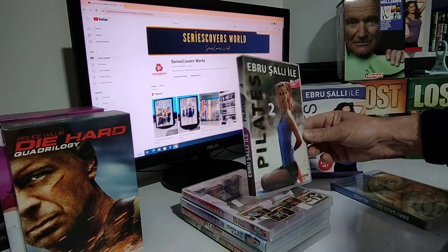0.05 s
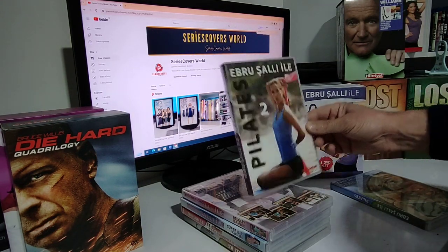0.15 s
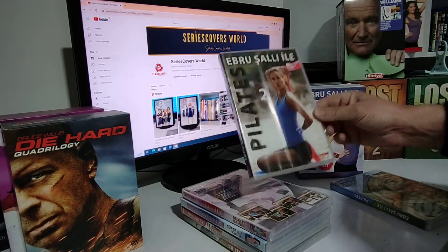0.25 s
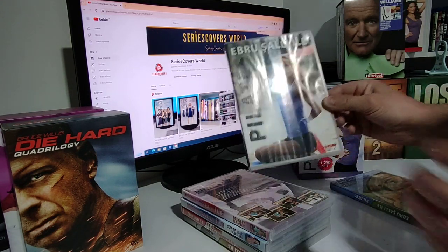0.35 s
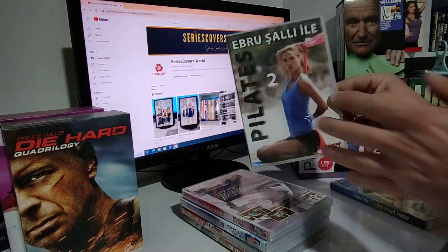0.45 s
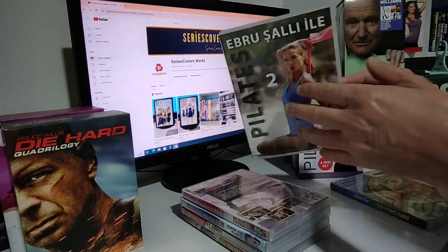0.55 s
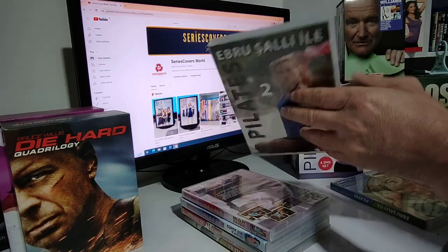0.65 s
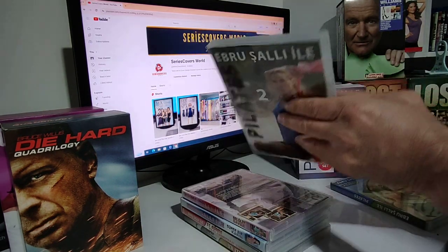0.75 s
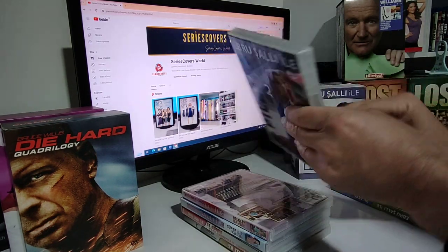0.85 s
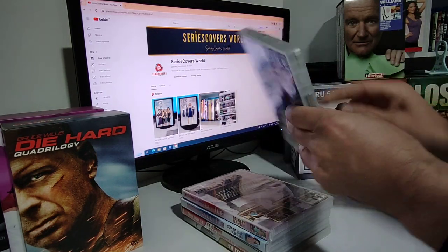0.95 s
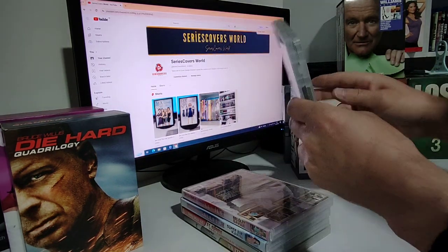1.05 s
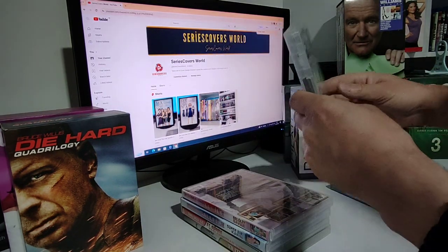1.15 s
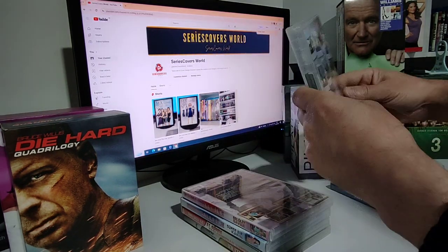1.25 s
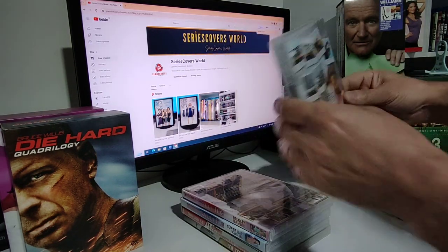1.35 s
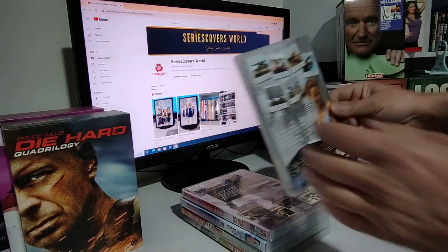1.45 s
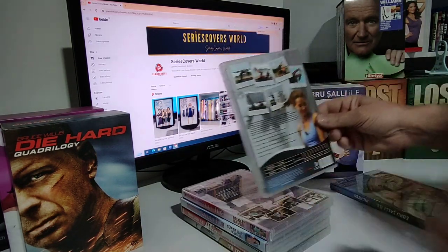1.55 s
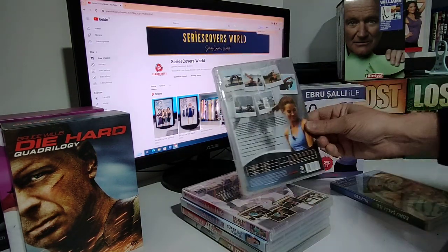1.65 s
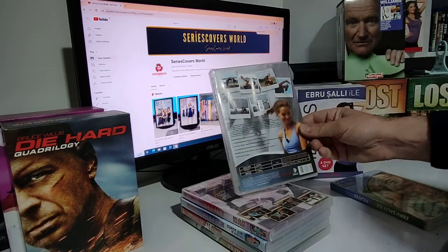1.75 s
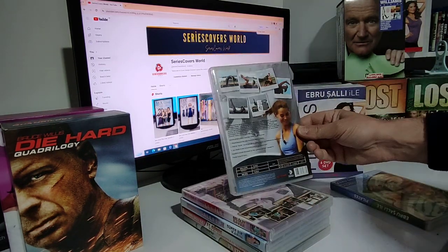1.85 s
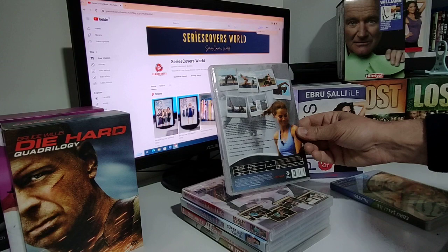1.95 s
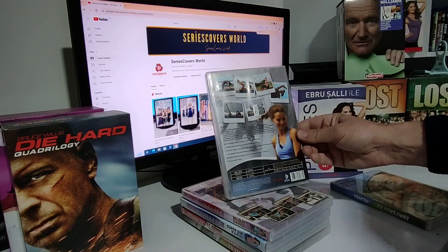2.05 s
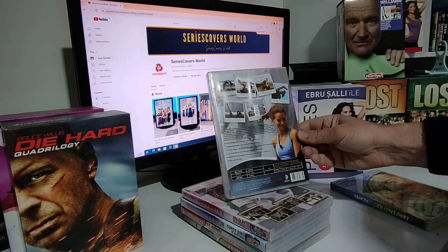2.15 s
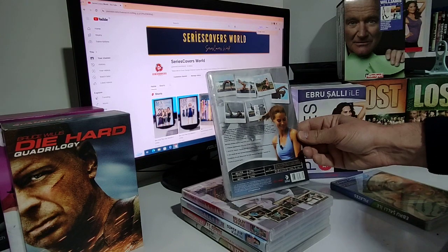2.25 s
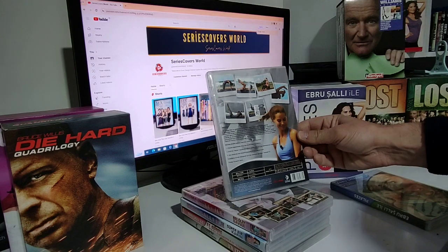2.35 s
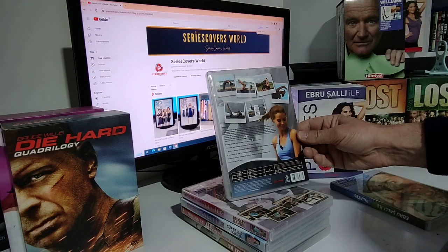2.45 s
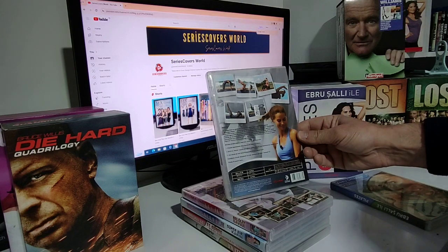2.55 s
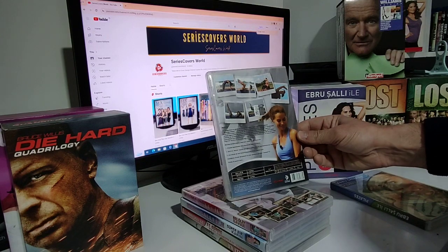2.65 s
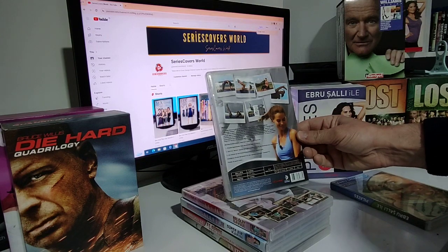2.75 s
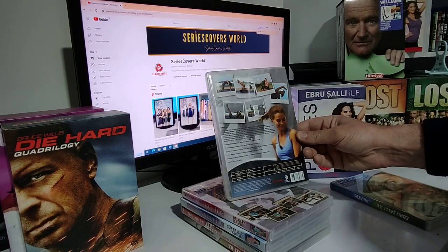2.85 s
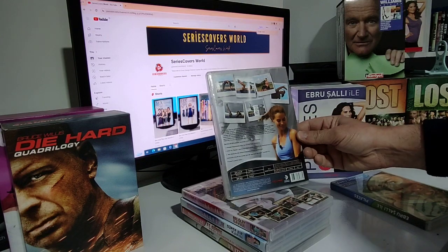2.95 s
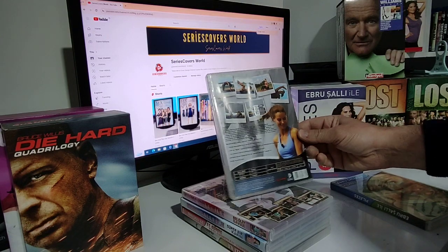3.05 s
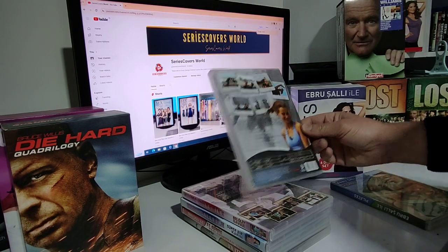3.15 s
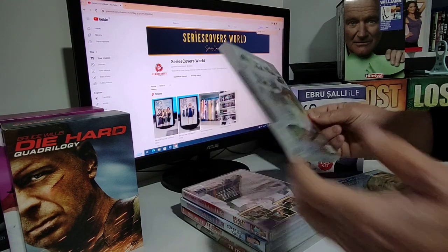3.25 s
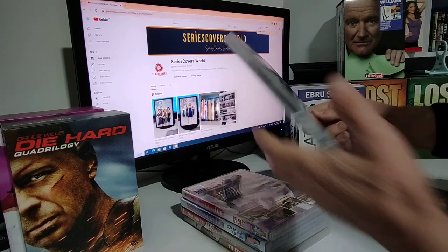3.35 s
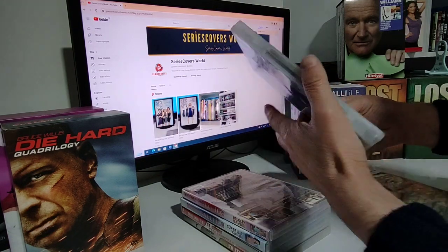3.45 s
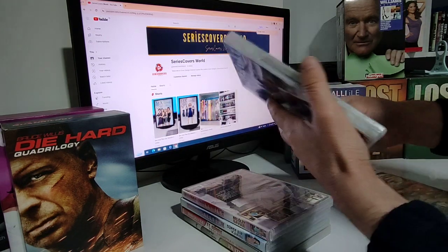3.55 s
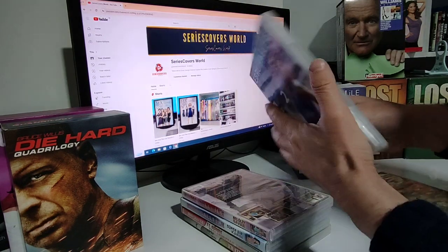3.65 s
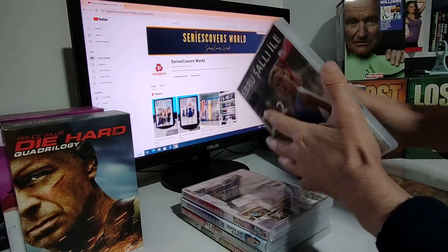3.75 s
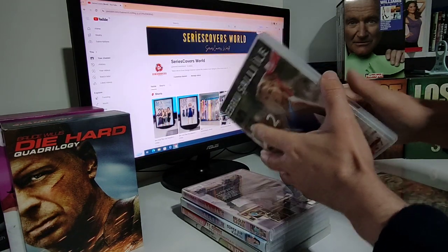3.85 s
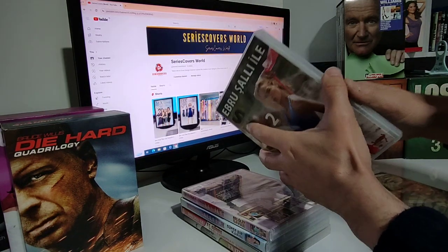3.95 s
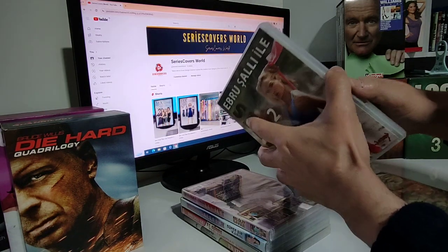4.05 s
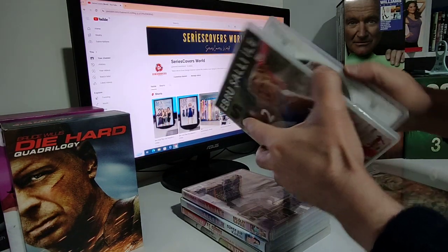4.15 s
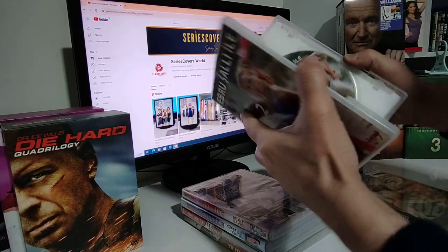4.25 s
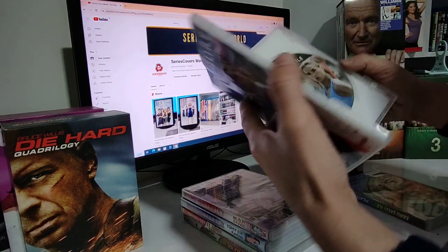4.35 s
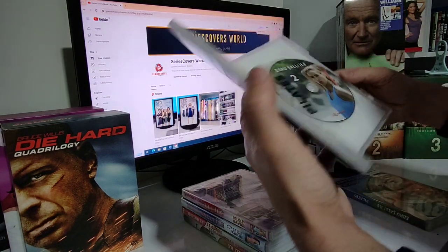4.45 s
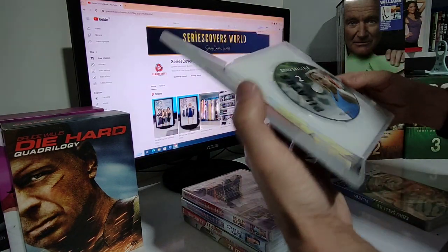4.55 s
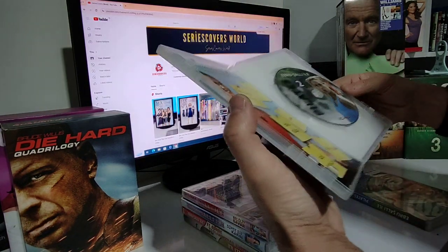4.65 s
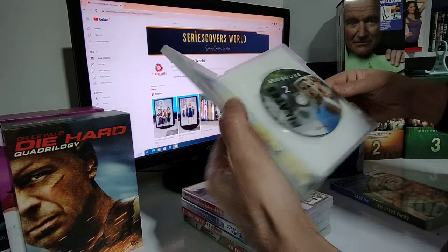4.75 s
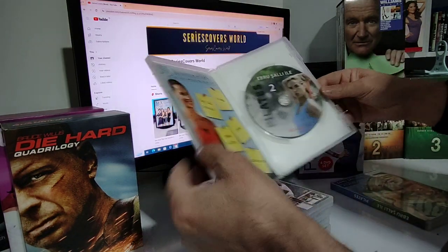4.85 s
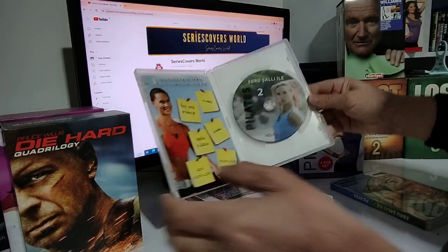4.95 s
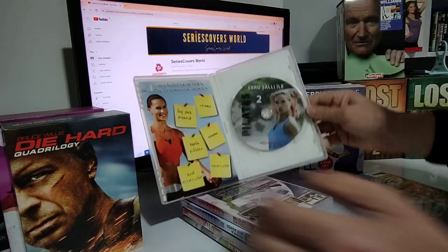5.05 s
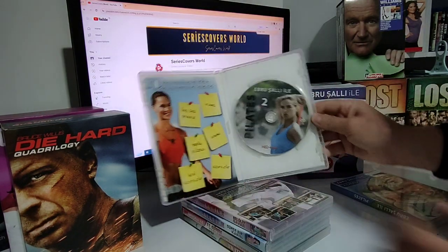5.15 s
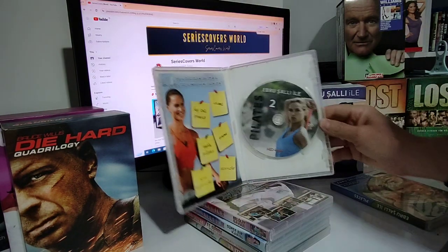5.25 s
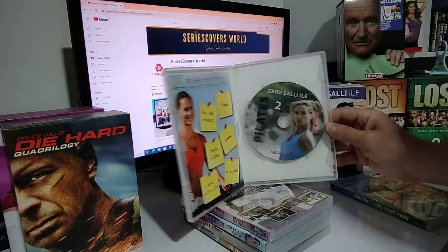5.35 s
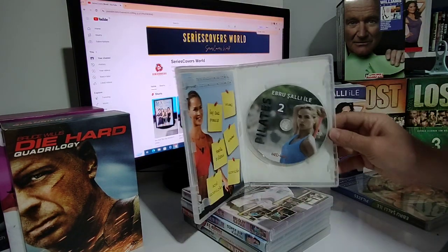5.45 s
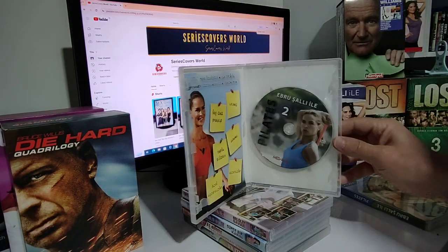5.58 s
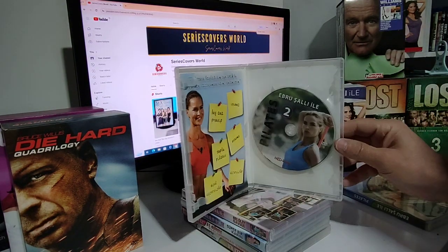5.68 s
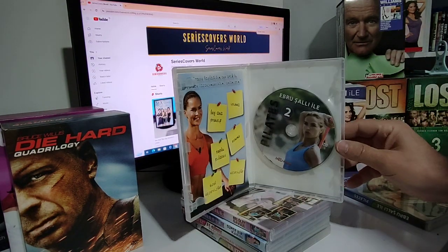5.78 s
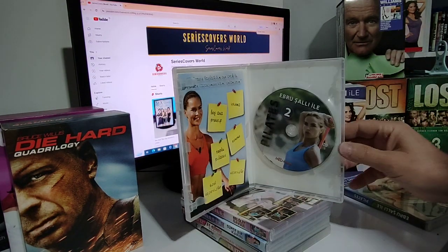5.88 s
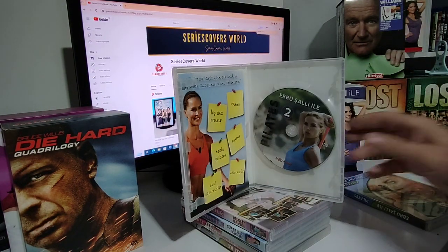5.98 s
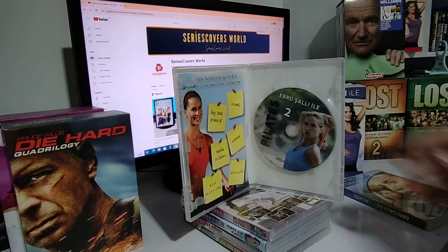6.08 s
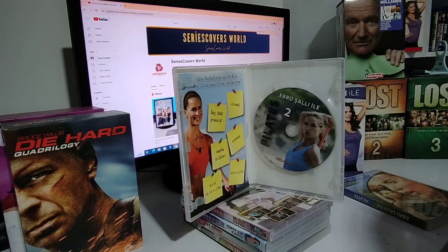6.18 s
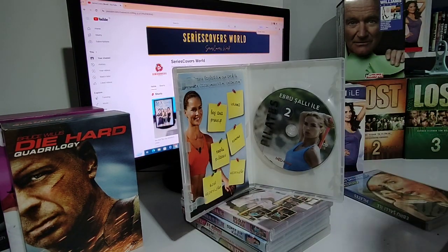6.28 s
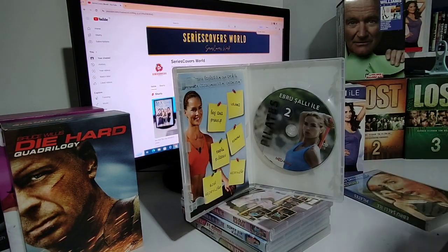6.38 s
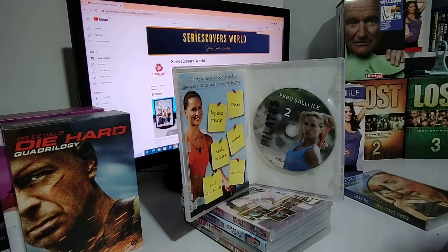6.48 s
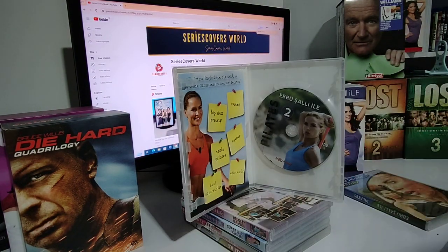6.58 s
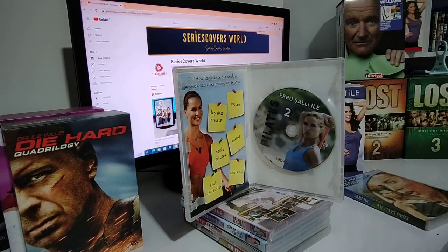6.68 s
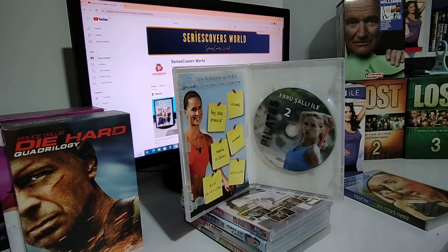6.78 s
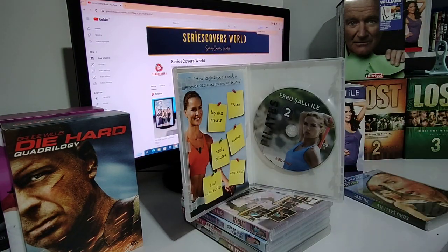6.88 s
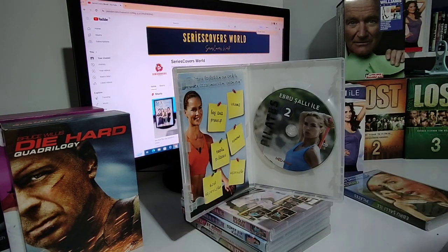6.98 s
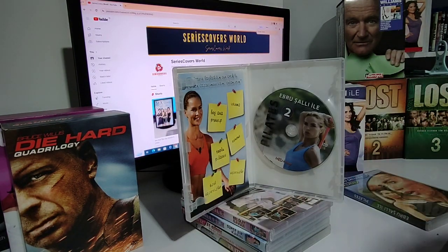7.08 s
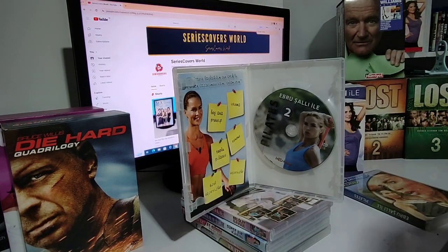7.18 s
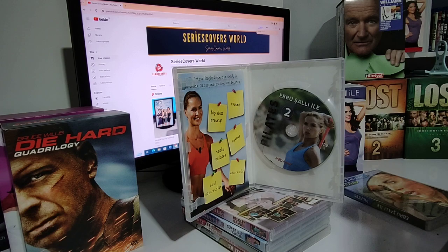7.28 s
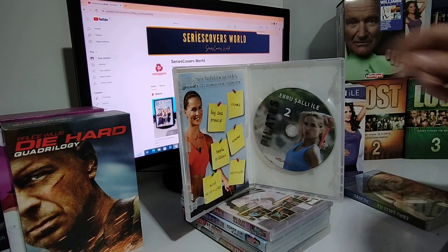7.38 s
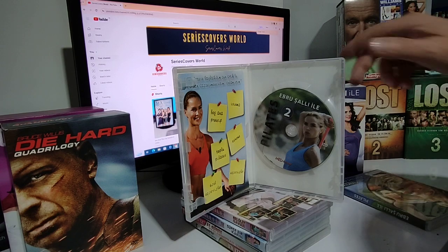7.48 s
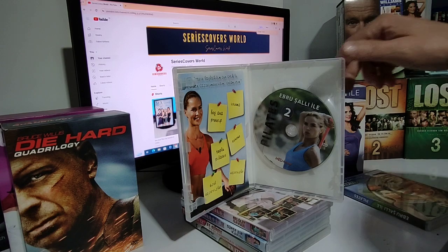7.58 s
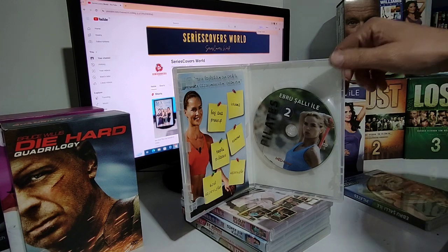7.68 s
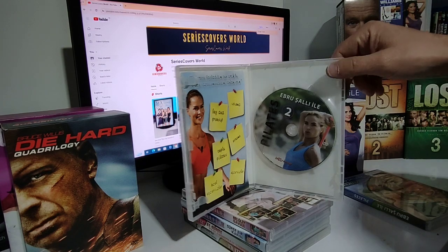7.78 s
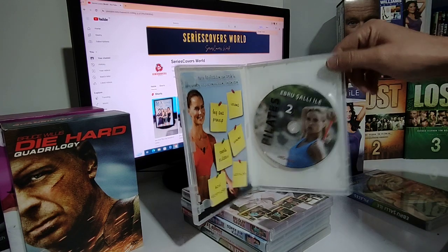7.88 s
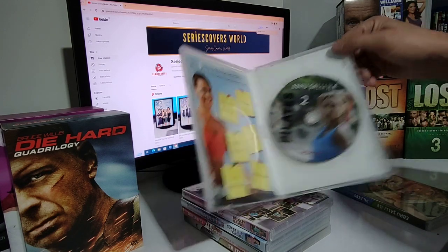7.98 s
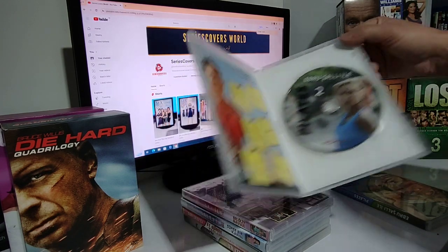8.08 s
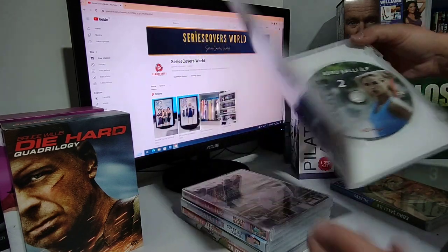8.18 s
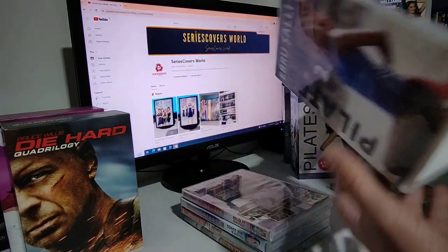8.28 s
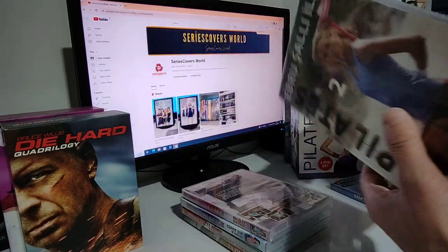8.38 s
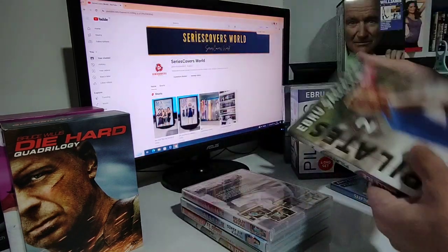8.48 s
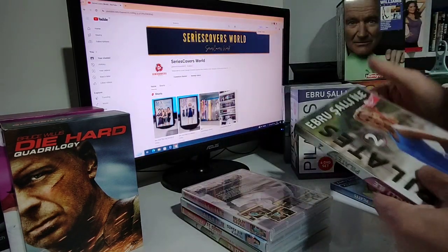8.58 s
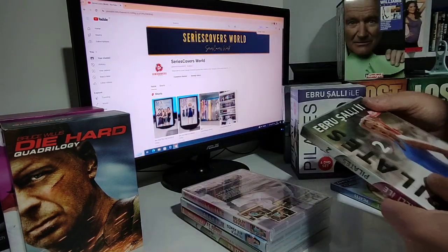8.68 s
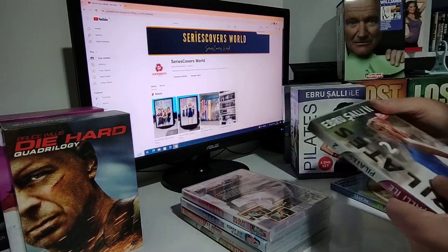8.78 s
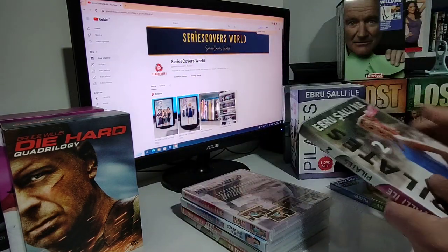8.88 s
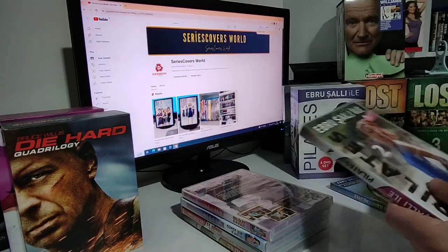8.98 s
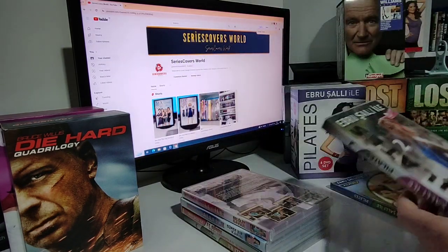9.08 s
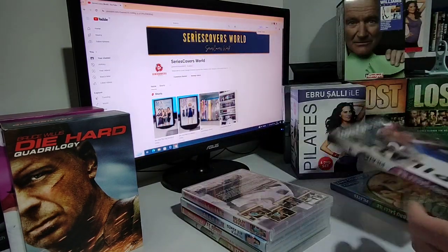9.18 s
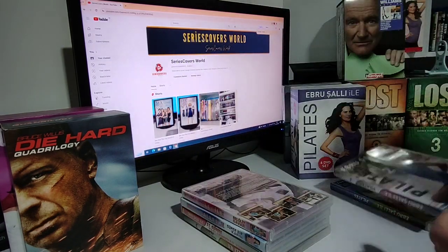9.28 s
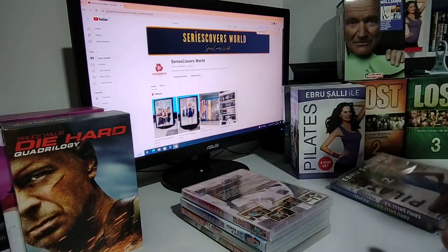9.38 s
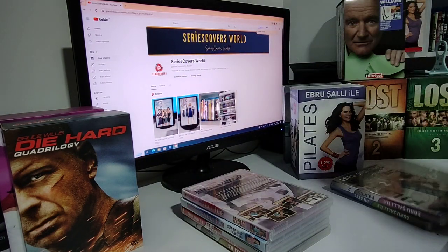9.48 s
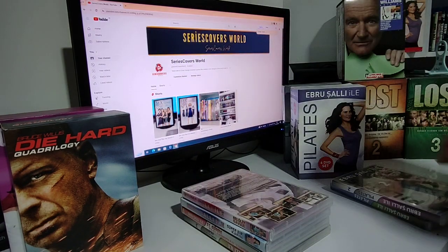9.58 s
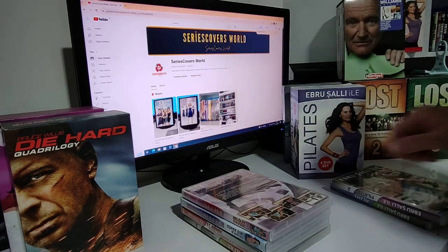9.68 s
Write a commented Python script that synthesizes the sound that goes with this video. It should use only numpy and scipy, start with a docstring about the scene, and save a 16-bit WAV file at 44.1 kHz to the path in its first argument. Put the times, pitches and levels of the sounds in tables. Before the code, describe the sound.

Close handling of a plastic case: light finger rubs, a sharp pop open, loose disc clacks, crisp closing snaps, then a desk clatter.

```python
"""Disc case at a desk

In a small room with a humming fan, a plastic disc case is tapped, popped open, folded, snapped shut
and dropped on the desk, heard close by a stereo pair of microphones, slightly nearer the left one.
Impacts are banks of decaying modes plus short noise, followed by a brief diffuse room answer.
Sliding fingers are grainy bands of noise with creaks; the fan is three sines over noise."""
import sys
import numpy as np
from scipy import signal
from scipy.fft import rfft, irfft, next_fast_len
from scipy.io import wavfile
from scipy.ndimage import map_coordinates

SR = 44100
rng = np.random.default_rng(int(sys.argv[2]) if len(sys.argv) > 2 else 0)


def transcribe(u):
    """Save the signal u as a 16-bit wav file named by the first command-line argument.

    u: samples, shape (n,) or (channels, n), limited to [-1, 1]; the rate is SR.
    q: integer samples, one column per channel.
    """
    v = np.clip(np.atleast_2d(u).T, -1, 1)
    q = np.round(v * 32767).astype(np.int16)
    wavfile.write(sys.argv[1], SR, q)


N = 429093  # length in samples


def amp(db):
    """Decibels to gain."""
    return 10 ** (np.asarray(db) / 20)


def unit(x):
    """Scale to rms 1."""
    return x / np.sqrt(np.mean(x ** 2) + 1e-20)


def burst(x):
    """Scale a short stereo sound to the energy of 20 ms at rms 1."""
    return x / np.sqrt(np.sum(x ** 2) / (2 * .02 * SR) + 1e-20)


def along(points, hz):
    """Read (frequency, value) points on a log frequency axis."""
    f, v = np.transpose(points)
    return np.interp(np.log(hz + 1), np.log(f + 1), v)


def wobble(rate):
    """A smooth random curve, rate knots a second."""
    knots = rng.standard_normal(int(N * rate / SR) + 4)
    return map_coordinates(knots, [np.arange(N) * rate / SR])


def add(out, s, sound, pan_db=0):
    """Mix a short stereo sound into out at s seconds; positive pan_db leans left."""
    part = out[:, round(s * SR):][:, :sound.shape[1]]
    panned = sound * amp([[pan_db / 2], [-pan_db / 2]])
    part += panned[:, :part.shape[1]]


# likeness of noise at the two microphones: freq_hz, correlation
ALIKE = [(25, 0.12), (60, 0.88), (120, 0.4), (300, 0.44), (800, 0.165), (2000, 0.073), (8000, 0.029)]


def noise(spectrum, size):
    """Coloured stereo noise of rms 1, most alike at the two microphones in the bass."""
    m = next_fast_len(size)
    hz = np.fft.rfftfreq(m, 1 / SR)
    turn = np.arccos(np.clip(along(ALIKE, hz), -1, 1)) / 2
    white = rfft(rng.standard_normal((2, m)))
    coloured = white * amp(along(spectrum, hz)) * [np.cos(turn), np.sin(turn)]
    mid, side = irfft(coloured, m)[:, :size]
    return unit(np.array([mid + side, mid - side]))


LEAD_S = .00014  # the case is about 5 cm nearer to the left microphone


def ring(modes, t, scatter_db, spread_hz=2000):
    """Struck modes at fresh strengths; short waves reach the two microphones out of step."""
    hz, db, t60 = np.transpose(modes)[:, :, None]
    size, start, skew = rng.standard_normal((3, len(modes), 1))
    attack = 1 - np.exp(-2 * hz * t)
    decay = amp(db + scatter_db * size - 60 * t / t60) * attack
    apart = np.minimum(hz / spread_hz, 1) * skew + np.pi * hz * LEAD_S  # half the phase gap
    wave = decay * np.exp(1j * (2 * np.pi * hz * t + np.pi * start))
    left, right = [np.sum(wave * np.exp(1j * side * apart), 0).imag for side in (1, -1)]
    return burst(np.array([left, right]))


def favour(points, centre_hz, octave_db=6.5):
    """The spot that is struck favours the resonances around one frequency."""
    def loss_db(hz):
        return octave_db * min(abs(np.log2(hz / centre_hz)), 2)
    return [(hz, db - loss_db(hz), *rest) for hz, db, *rest in points]


def chatter(x, t, life_s, size_db, count=5):
    """Light plastic does not seat at once: a few re-contacts follow within milliseconds."""
    when, strength = rng.uniform(.1, 1, (2, count))
    sizes = amp(size_db) * strength * (1.1 - when)
    contacts = np.bincount((when * life_s * SR).astype(int), sizes, len(t))
    contacts[0] += 1
    return burst(signal.fftconvolve(x, contacts[None], axes=1)[:, :len(t)])


# how quickly the small room dies away: freq_hz, t60_s
ROOM = [(100, 0.16), (300, 0.13), (1000, 0.15), (5000, .17), (14000, 0.13)]


def room(x, t, wet_db, gap=0.0047, width=0.1):
    """Add the diffuse, quickly dying answer of desk, screen and shelves, in the colour of the hit."""
    power = np.cumsum(np.mean(abs(rfft(x)) ** 2, 0))
    k = np.arange(len(power))
    reach = 2 + k * width  # many paths blur the resonances together
    blurred = np.interp(k + reach, k, power) - np.interp(k - reach, k, power)
    colour = np.sqrt(abs(blurred) / reach)
    diffuse = irfft(rfft(noise([(20, 0), (20000, 0)], size=len(t))) * colour, len(t))
    hz, s, z = signal.stft(diffuse, SR, nperseg=256)
    fade = amp(-60 * s / along(ROOM, hz)[:, None])
    tail = signal.istft(z * fade, SR, nperseg=256)[1][:, :len(t)]
    tail = tail * (1 - np.exp(-(t / gap) ** 2))  # builds up over gap seconds
    return x + amp(wet_db) * tail * np.linalg.norm(x) / np.linalg.norm(tail)


# steady tones of the fan: freq_hz, level_db (rms)
HUM = [(96.9, -75.5), (285.3, -74), (473.7, -84.5)]
# spectrum of fan and room rumble: freq_hz, level_db (relative, per Hz)
AIR = [(20, -1), (30, -20), (50, -15), (70, -21), (100, -13.5), (125, -18), (188, -25), (280, -21.5),
       (330, -23.5), (500, -30), (750, -32), (1000, -38), (2000, -70)]
# spectrum of microphone hiss: freq_hz, level_db (relative, per Hz)
FIZZ = [(500, -12.5), (1000, -1), (1500, -0.5), (2200, -1), (3200, -5), (4300, -4.5), (6500, -11),
        (9000, -18), (11000, -13), (13000, -8), (16000, -10)]


def background():
    """A slightly unsteady fan hum over room rumble and microphone hiss."""
    t = np.arange(N) / SR
    hum = np.zeros(N)
    for hz, db in HUM:
        level = amp(db + 0.44 * wobble(1.8)) * np.sqrt(2)
        hum += level * np.sin(2 * np.pi * hz * t + 0.27 * wobble(11))
    return hum + amp(-55.5) * noise(AIR, size=N) + amp(-71.0) * noise(FIZZ, size=N)


SWING_S, SWING_HALF_S, SWING_DB = 8.58, .13, -56  # middle, half length, peak level
# spectrum of the puff: freq_hz, level_db (relative, per Hz)
DRAUGHT = [(20, 0), (50, 2.5), (100, -1.5), (160, -23), (400, -45)]


def draught():
    """The folding lid fans the air: a soft low puff as the case is swung shut."""
    t = np.arange(N) / SR
    swell = np.exp(-.5 * ((t - SWING_S) / SWING_HALF_S) ** 2)
    return amp(SWING_DB) * swell * noise(DRAUGHT, size=N)


# modes of the case shell, also rung by every strike: freq_hz, level_db (relative), t60_s
SHELL = [(603, -8.5, 0.031), (762, -2, 0.043), (926, -2.5, 0.088), (985, 4.5, .06), (1209, -3.5, .04),
         (1384, 0, 0.11), (1594, -2, .045), (1825, 2, 0.028), (2075, -4.5, 0.05), (2260, -6.5, 0.03),
         (2590, 1, 0.024), (2752, -13, 0.05), (3300, -3, .055), (3665, 0.5, 0.027), (4704, -4.5, 0.016),
         (5240, -7, .045), (5670, -2.5, 0.026), (6270, -9.5, 0.025), (7124, 1.5, 0.046)]
# spectrum of a plastic click, also in strikes and the disc: freq_hz, level_db (relative, per Hz)
CLICK = [(300, -18), (900, -2), (1350, -10), (1750, 1.5), (2300, 1.5), (3400, -2.5), (4300, -4), (5500, -3),
         (7000, -1), (9000, -16), (16000, -11.5)]
CREAKS_PER_S, CREAK_SCATTER_DB, CREAK_DB = 190, 7, -2  # rate, spread of size, gain against the rub
CREAK_HZ = 1200  # the resonances that creaks favour


def creaks(pressure, count=4):
    """Larger slips at a few spots of the case, each spot ringing the shell in its own way."""
    out, t = np.zeros((2, N)), np.arange(SR // 10) / SR
    for _ in range(count):
        happens = rng.random(N) < CREAKS_PER_S / count / SR
        slips = happens * amp(CREAK_SCATTER_DB * np.clip(rng.standard_normal(N), -2, 2))
        click = burst(noise(CLICK, size=len(t)) * amp(-60 * t / .008))
        spot = ring(favour(SHELL, CREAK_HZ, octave_db=5.5), t, scatter_db=6.5) + 1.5 * click
        spot = spot / np.linalg.norm(spot[0])
        out += signal.fftconvolve((pressure * unit(slips))[None], spot, axes=1)[:, :N]
    return out / np.sqrt(count)


def friction(level, bright_db):
    """Power of the rub, rasp and hiss of a sliding contact, tilted around the rasp."""
    return (amp([[-bright_db], [0], [bright_db]]) * level) ** 2


# finger strokes, before the band gains: middle_s, half_length_s, level_db,
# treble_tilt_db (a light touch hisses, a firm one rubs)
STROKES = [(.8, 0.025, -64, -2), (1.308, 0.017, -61.5, -4), (3.1, .09, -75, 1.5),
           (3.498, 0.015, -56.5, 4.5), (3.675, .027, -48.5, -2.5), (3.77, 0.075, -65.5, -7),
           (3.94, .02, -68, -2), (4.05, 0.024, -65.5, -7.5), (4.378, 0.088, -68, 0.5),
           (4.776, 0.013, -64, 11), (5.338, 0.047, -68.5, -1.5), (6.421, 0.038, -69.5, 6),
           (7.05, .022, -63.5, 2), (7.91, 0.042, -66.5, -0.5), (8.444, 0.033, -56, -0.5),
           (8.497, 0.032, -55, -7), (8.82, 0.03, -68, -4), (9.107, 0.032, -63, 4.5)]
# the hands shifting their grip between strokes, before the band gains: time_s, level_db
GRIP = [(0, -81.5), (.45, -75), (.95, -78), (1.55, -74.5), (2, -80.5), (2.8, -100), (3.1, -80), (3.9, -68),
        (4.3, -79.5), (4.7, -72), (5, -80.5), (5.4, -73), (6, -82), (7.3, -84.5), (7.8, -75.5), (8.15, -79)]
GRIP_WANDER_DB, GRIP_RATE = 2, 10  # its random swells, and their knots a second
# the case skids to rest: start, level before the band gains and fade, treble tilt
SKID_S, SKID_DB, SKID_DB_PER_S, SKID_BRIGHT_DB = 9.42, -53.5, -115, -8.5
# gains of the three friction bands: rub_db, rasp_db, hiss_db
FRICTION_DB = (-1, 0.18, 1.5)
# spectra of the low, middle and high friction band: freq_hz, level_db (relative, per Hz)
RUB = [(100, -21.5), (400, -6.5), (650, -4.5), (780, 1.5), (970, 2), (1250, -0.5), (1700, -1), (2150, -1),
       (3500, -27), (8000, -44.5)]
RASP = [(1200, -30.5), (2500, -3.5), (4000, -2), (7000, -5), (9000, -12), (16000, -36.5)]
HISS = [(4000, -17.5), (8000, -12.5), (10000, -2), (12500, 4.5), (16000, 2)]


def sliding():
    """Skin catches and slips on the sleeve, and the case skids on the desk: all grainy with tiny slips."""
    t = np.arange(N) / SR
    grip_db = np.interp(t, *np.transpose(GRIP)) + GRIP_WANDER_DB * wobble(GRIP_RATE)
    power = friction(amp(grip_db), bright_db=0.5)
    for s, half, db, bright_db in STROKES:
        near = abs(t - s) < 4 * half
        swell = np.exp(-.5 * ((t[near] - s) / half) ** 2)
        power[:, near] += friction(amp(db) * swell, bright_db)
    skid = (t > SKID_S) * amp(SKID_DB + SKID_DB_PER_S * abs(t - SKID_S))
    power += friction(skid, SKID_BRIGHT_DB)
    rub, rasp, hiss = np.sqrt(power) * amp(FRICTION_DB)[:, None]
    slips = unit(amp(1.4 * wobble(450) + 1.4 * wobble(70)))
    bands = rub * noise(RUB, size=N) + rasp * noise(RASP, size=N) + hiss * noise(HISS, size=N)
    return slips * bands + amp(CREAK_DB) * creaks(rub)


# the disc rocks on its hub: start_s, peak_db (the body of a clack lies RATTLE_DB from it)
RATTLES = [(4.904, -41.5), (5.009, -37.5), (5.107, -40), (5.155, -44.5), (5.318, -45.5), (5.353, -43),
           (5.402, -47), (5.432, -50), (5.492, -47), (5.581, -45.5), (5.716, -46), (5.754, -49),
           (5.822, -55), (7.759, -49), (7.855, -39), (7.891, -35.5), (7.923, -42)]
# modes of the disc in its tray: freq_hz, level_db (relative), t60_s
DISC = [(413, 0.5, 0.049), (658, 5.5, 0.072), (710, 6.5, 0.024), (963, -2, 0.024), (1255, -4.5, 0.096),
        (1470, -3, 0.034), (1685, 0.5, 0.026), (2230, -0.5, 0.037), (2350, -29, 0.025), (2700, 1, 0.032),
        (2750, -22, 0.016), (3324, -8, 0.055), (4060, -5, 0.037), (5360, -12, 0.035), (6760, -24, 0.025)]
RATTLE_DB = -12  # body of a clack over its peak
REBOUND_S, REBOUND_DB = .025, -10.5  # the disc falls back more softly: delay scale, level


def disc():
    """While the case stands open, the loose disc clacks against its tray at every tilt and falls back."""
    out, t = np.zeros((2, N)), np.arange(SR // 5) / SR
    for s, db in RATTLES:
        for delay, loss_db in (0, 0), (REBOUND_S * rng.uniform(.5, 1.2), REBOUND_DB):
            tick = burst(noise(favour(CLICK, centre_hz=2100), size=len(t)) * amp(-60 * t / .014))
            contact = ring(DISC, t, scatter_db=3) + 0.29 * tick
            clack = chatter(contact, t, life_s=0.006, size_db=4.0)
            add(out, s + delay, room(amp(db + loss_db + RATTLE_DB) * clack, t, wet_db=-7.5))
    return out


# trims of a contact at hardness 0, and their change per unit of hardness
THUD_DB, KNOCK_DB, CRACK_DB = 0, 0, -13.5
THUD_PER_HARD_DB, KNOCK_PER_HARD_DB, CRACK_PER_HARD_DB = -10, -9.5, 11.5


def touch(hardness):
    """Thud, knock and crack trims (dB): harder contacts lose body and gain edge."""
    thud_db = THUD_DB + THUD_PER_HARD_DB * hardness
    knock_db = KNOCK_DB + KNOCK_PER_HARD_DB * hardness
    crack_db = CRACK_DB + CRACK_PER_HARD_DB * hardness
    return thud_db, knock_db, crack_db


# modes of the struck panel: pitch_multiple, level_db (relative), t60_s
PANEL = [(.47, -8, 0.014), (.62, -12.5, 0.014), (.82, -7.5, 0.02), (1, -1.5, 0.013), (1.14, -5, 0.013),
         (1.78, -10.5, 0.011), (3.1, -15, .015)]
# spectrum of the sharp edge: freq_hz, level_db (relative, per Hz)
CRACK = [(2000, -27.5), (6000, 2), (7500, 4), (9500, -1.5), (12500, 3), (16000, -4)]


def strike(body, db, hz, bright_hz, thud_db, knock_db, crack_db):
    """A contact bends the body, knocks one panel, rings the shell and cracks at the edge."""
    t = np.arange(SR // 5) / SR
    push = ring([(243, 0, 0.023)], t, scatter_db=0)  # the first shove on the air
    thud = burst(0.41 * push + ring(body, t, scatter_db=2.5))
    rise = 1 - np.exp(-t / 0.00034)
    # the hand damps the panel within a few cycles
    panel = [(hz * k, level, t60) for k, level, t60 in PANEL]
    knock = burst(rise * ring(panel, t, scatter_db=0.5))
    click = burst(noise(favour(CLICK, bright_hz), size=len(t)) * amp(-60 * t / 0.016))
    ringing = click + 0.96 * ring(favour(SHELL, bright_hz), t, scatter_db=1.0)
    shell = chatter(rise * ringing, t, life_s=.007, size_db=0)
    crack = burst(noise(CRACK, size=len(t)) * rise * amp(-60 * t / 0.02))
    hit = amp(thud_db - 4.5) * thud + amp(knock_db - 1.5) * knock
    hit = hit + amp(-3.5) * shell + amp(crack_db - 3.2) * crack
    return room(amp(db) * hit, t, wet_db=-6.0)


# slow bending of the whole case, for taps and snaps: freq_hz, level_db (relative), t60_s
FLEX = [(170, -7.5, 0.063), (202.4, 0.5, 0.025), (233, -1.5, 0.047), (391, -10.5, 0.058), (546, -12, 0.036)]
# fingers and the lid tap or catch on the case: start_s, level_db, pitch_hz,
# hardness (below 0 fleshy, above 0 sharp)
TAPS = [(0.636, -50, 594, 0.67), (.81, -48, 448, -0.16), (1.258, -64.5, 900, 0.048),
        (2.06, -59, 945, -0.82), (2.065, -55.5, 830, 0.21), (2.098, -61, 940, 0.036),
        (2.131, -65.5, 930, 0), (3.483, -59, 900, 1.2), (3.656, -54.5, 1000, 0), (3.675, -48.5, 1150, 0.42),
        (3.694, -53, 920, -.3), (3.736, -58, 920, 0.11), (3.747, -49, 990, 0.32),
        (3.815, -63.5, 900, 0.049), (4.765, -59, 884, 1.6), (5.109, -56.5, 440, -0.93),
        (5.12, -56.5, 665, -.4), (5.342, -60, 700, -0.87), (5.695, -64, 632, -0.85), (7.028, -58, 485, -.2),
        (8.442, -53, 1100, .2), (8.484, -51, 1270, -.1), (8.502, -33, 1257, 0.54)]
# shell resonances that a contact of hardness 0 favours; for taps, their rise per unit of hardness
TAP_BRIGHT_HZ, BRIGHT_OCTAVES = 2920, .5


def taps():
    """Light contacts on the case while it is held: the harder, the brighter."""
    out = np.zeros((2, N))
    for s, db, hz, hardness in TAPS:
        bright_hz = TAP_BRIGHT_HZ * 2 ** (BRIGHT_OCTAVES * hardness)
        add(out, s, strike(FLEX, db, hz, bright_hz, *touch(hardness)), pan_db=-1.3)
    return out


# the dropped case lands edge first, slaps flat and rocks: start_s, level_db, pitch_hz, hardness
LANDINGS = [(9.39, -39, 1010, -.1), (9.394, -36, 518, -0.35), (9.399, -32, 780, -0.2),
            (9.4763, -46, 920, 0.36), (9.496, -54, 770, -.5), (9.5276, -49.5, 900, 0.25),
            (9.534, -54, 880, -.5), (9.574, -60, 600, -.3)]
# the desk top under the landing case: freq_hz, level_db (relative), t60_s
DESK = [(128.4, 3, 0.14), (139.6, -1, 0.16), (196, 3, 0.043), (238, -11, 0.052), (430, -0.5, 0.068)]
DESK_DB = 2  # the desk top thumps more than the hand-held case
SETTLE_S, SETTLE_DB = 9.531, -44  # its weight finally comes down on the desk


def landing():
    """Each contact of the falling case also thumps the desk top."""
    out = np.zeros((2, N))
    for s, db, hz, hardness in LANDINGS:
        thud_db, knock_db, crack_db = touch(hardness)
        add(out, s, strike(DESK, db, hz, TAP_BRIGHT_HZ, thud_db + DESK_DB, knock_db, crack_db))
    thump = ring(DESK, np.arange(SR // 5) / SR, scatter_db=1)
    add(out, SETTLE_S, amp(SETTLE_DB) * thump)
    return out


# the hinge or a latch gives way: start_s, level_db, pitch_hz, shell_bright_hz, thud_trim_db,
# knock_trim_db, left_over_right_db, tick_early_s (the lip ticks first), tick_over_snap_db
SNAPS = [(4.1343, -24, 1120, 2100, -3.5, 4, -1.5, .0276, -8),
         (8.3736, -39, 677, 3800, -10.5, -10.5, 0, .0044, -6.5),
         (8.6539, -27, 794, 2980, -3.5, -4, -1, .0217, -17.5),
         (8.979, -20.5, 970, 3200, -25.5, -12.5, 4.5, .0196, -23)]
SNAP_CRACK_DB = -7  # trim of the sharp edge of a snap
LIP_HZ, LIP_HARDNESS = 1125, 0.47  # the lip slipping over its catch


def snaps():
    """The lip ticks over its catch, then the strained plastic lets go."""
    out = np.zeros((2, N))
    for s, db, hz, bright_hz, thud_db, knock_db, pan_db, early_s, tick_db in SNAPS:
        tick = strike(FLEX, db + tick_db, LIP_HZ, bright_hz, *touch(LIP_HARDNESS))
        add(out, s - early_s, tick, pan_db=-3.0)
        release = strike(FLEX, db, hz, bright_hz, thud_db, knock_db, SNAP_CRACK_DB)
        add(out, s, release, pan_db)
    return out


def scene():
    """The case, its disc and the hands, in the humming room."""
    return background() + draught() + sliding() + disc() + taps() + landing() + snaps()


TOP_HZ = 16200  # band limit


def record(dry):
    """The microphone channel passes nothing above its band limit."""
    m = next_fast_len(N + SR // 2)
    passed = np.fft.rfftfreq(m, 1 / SR) < TOP_HZ
    return irfft(rfft(dry, m) * passed, m)[:, :N]


dry = scene()
out = record(dry)
transcribe(out)
```